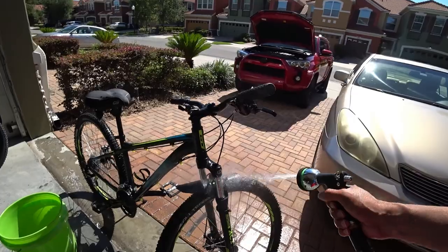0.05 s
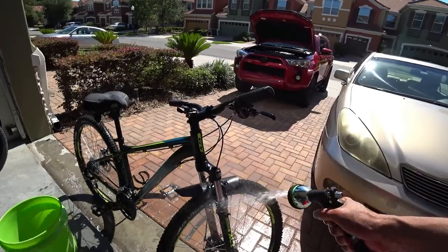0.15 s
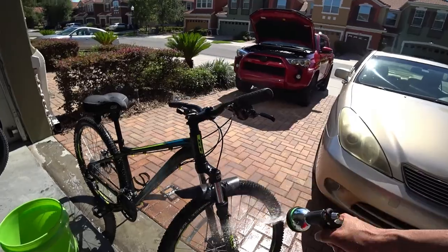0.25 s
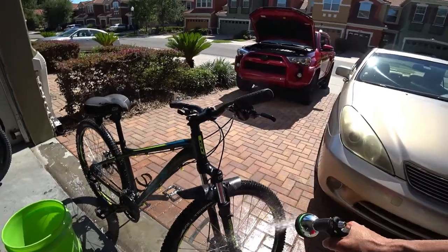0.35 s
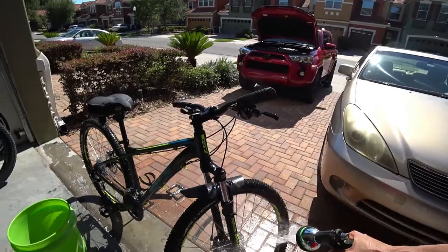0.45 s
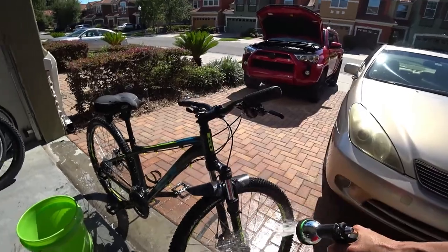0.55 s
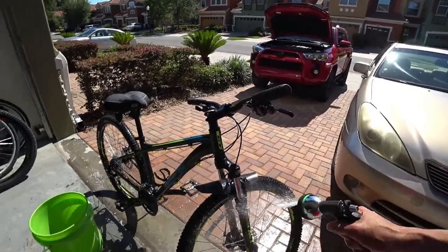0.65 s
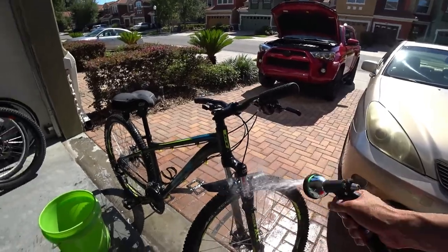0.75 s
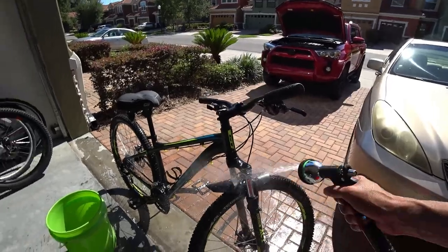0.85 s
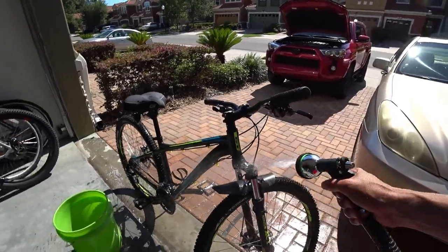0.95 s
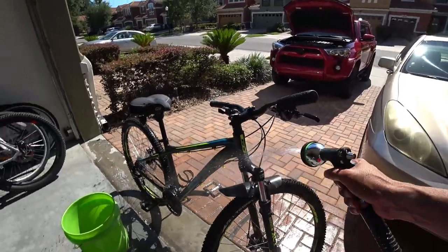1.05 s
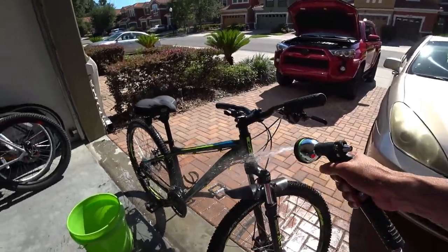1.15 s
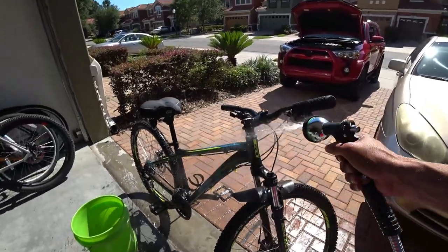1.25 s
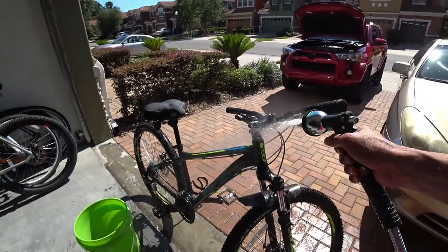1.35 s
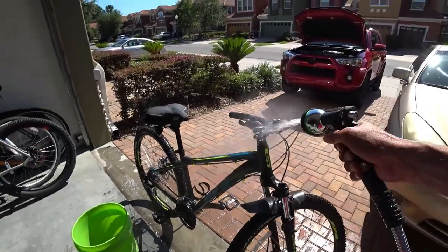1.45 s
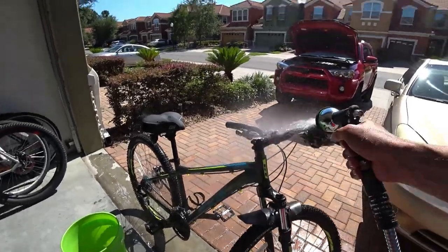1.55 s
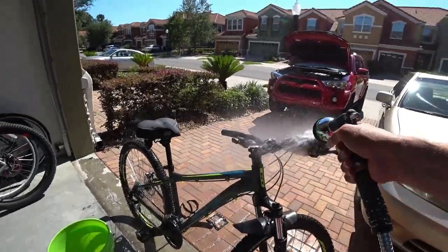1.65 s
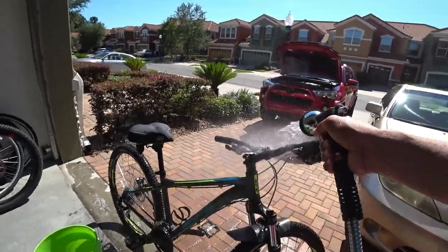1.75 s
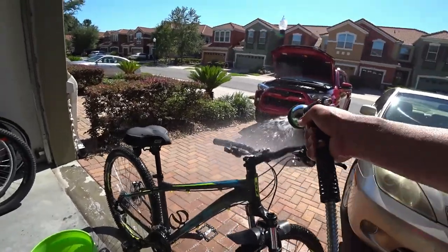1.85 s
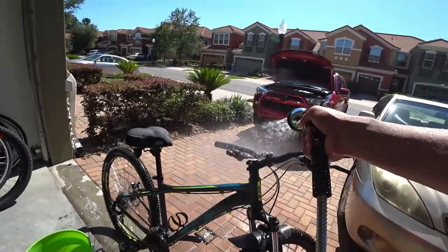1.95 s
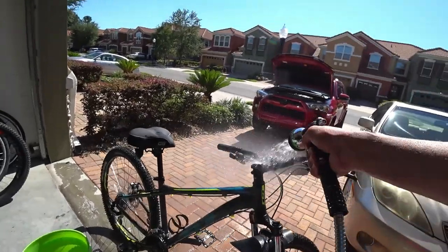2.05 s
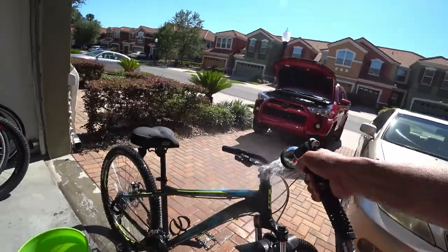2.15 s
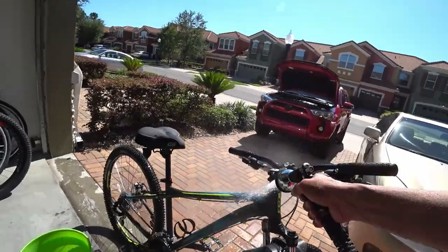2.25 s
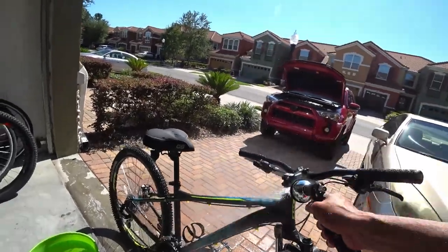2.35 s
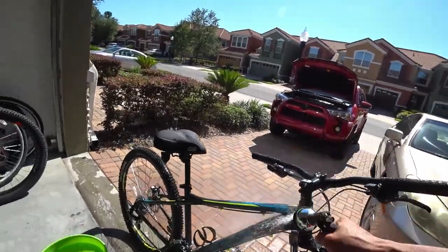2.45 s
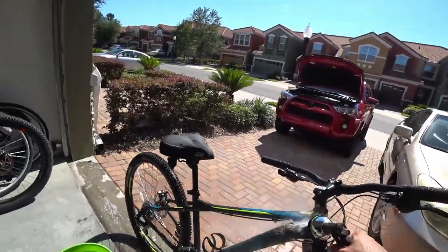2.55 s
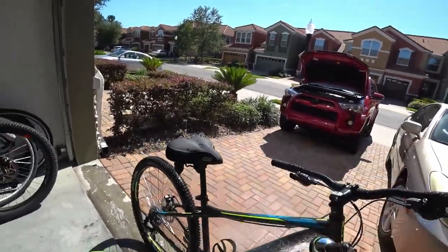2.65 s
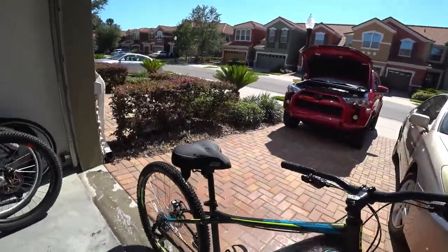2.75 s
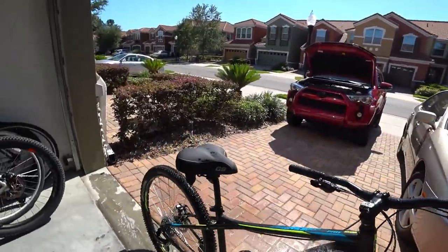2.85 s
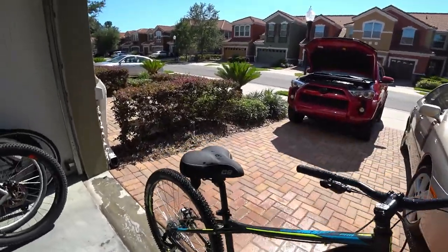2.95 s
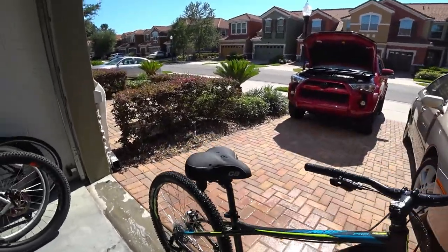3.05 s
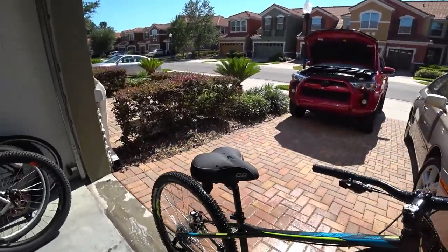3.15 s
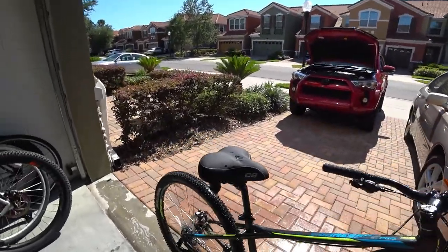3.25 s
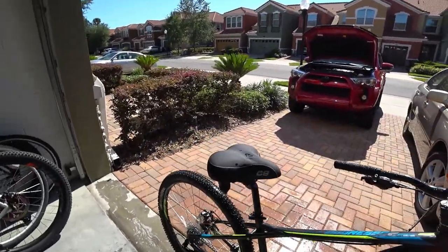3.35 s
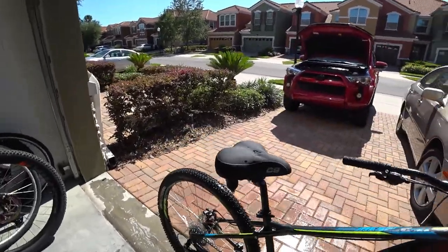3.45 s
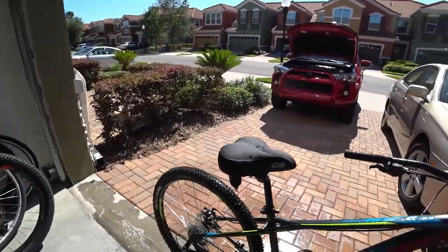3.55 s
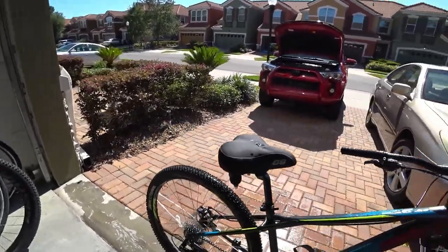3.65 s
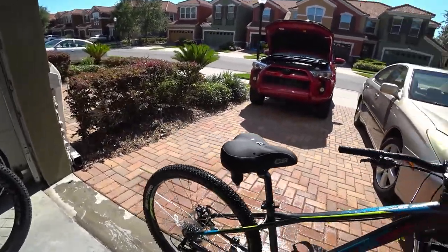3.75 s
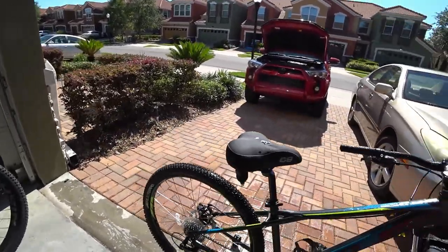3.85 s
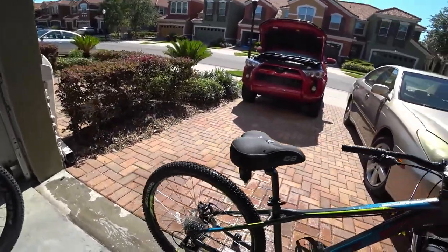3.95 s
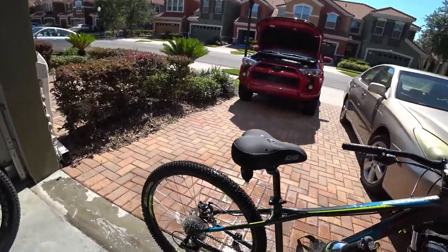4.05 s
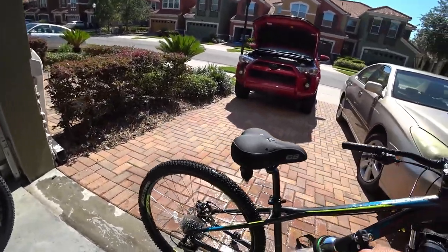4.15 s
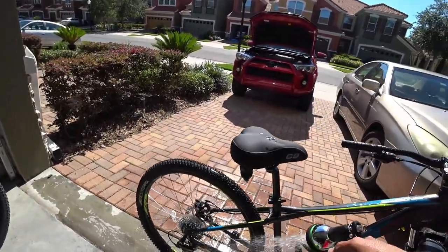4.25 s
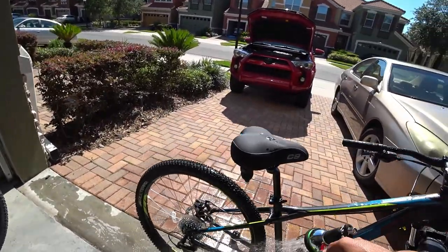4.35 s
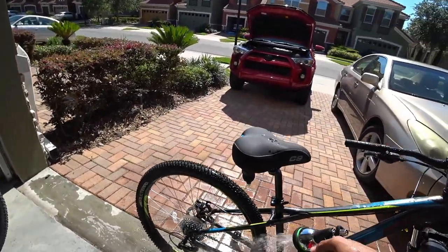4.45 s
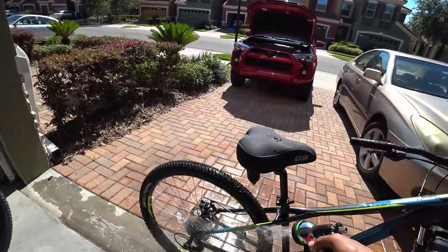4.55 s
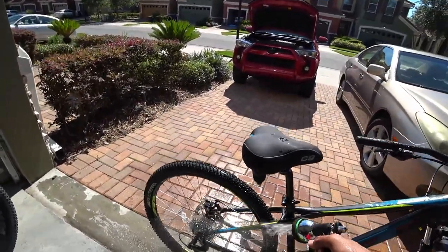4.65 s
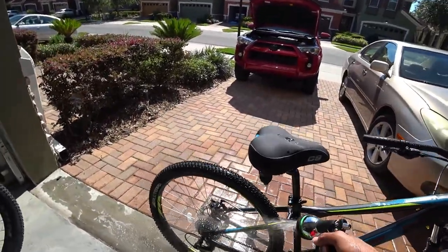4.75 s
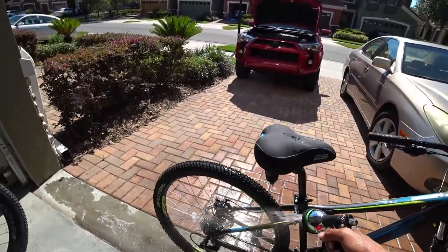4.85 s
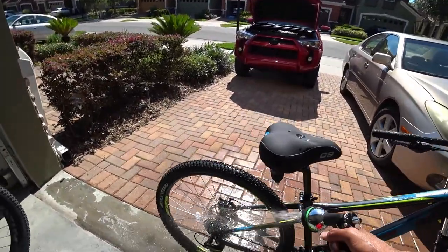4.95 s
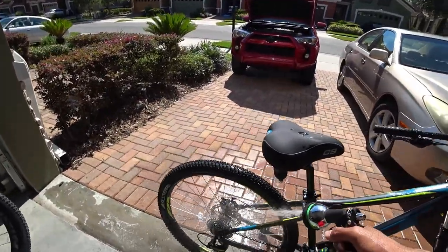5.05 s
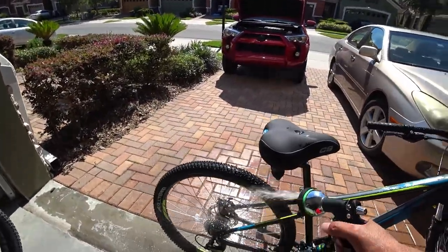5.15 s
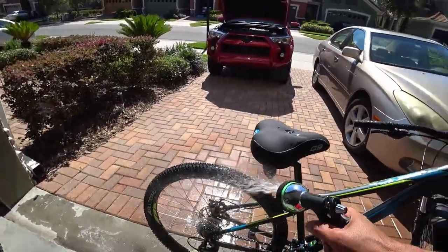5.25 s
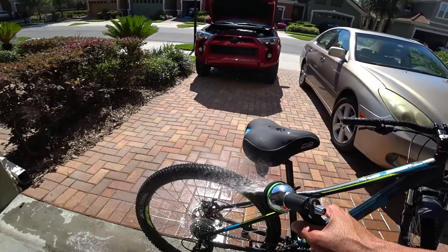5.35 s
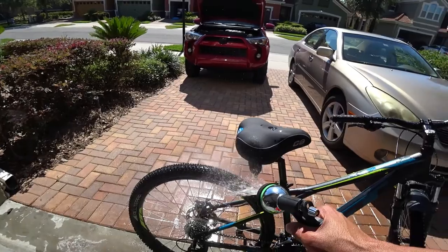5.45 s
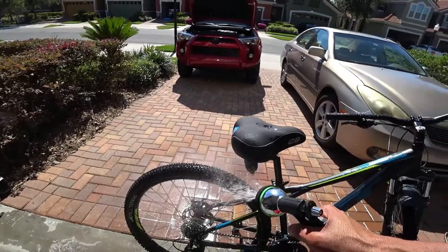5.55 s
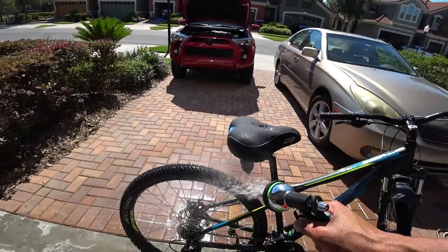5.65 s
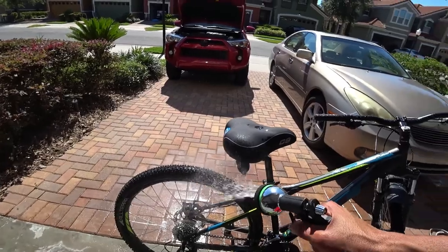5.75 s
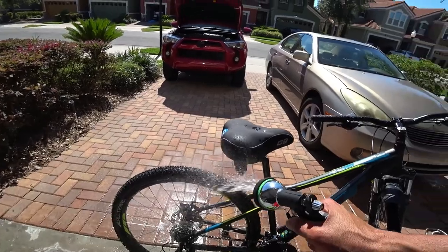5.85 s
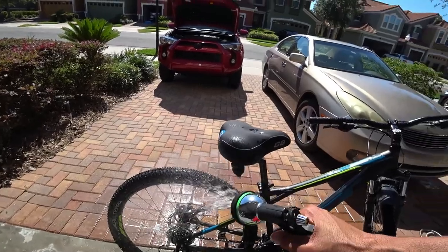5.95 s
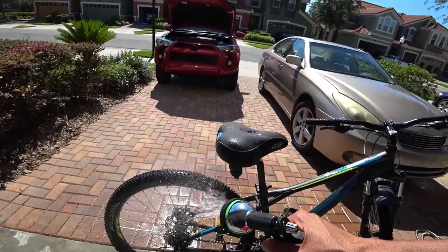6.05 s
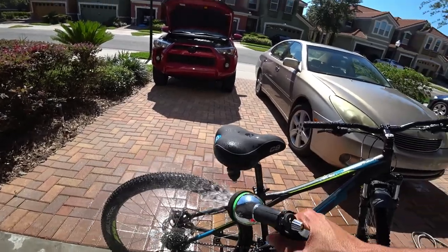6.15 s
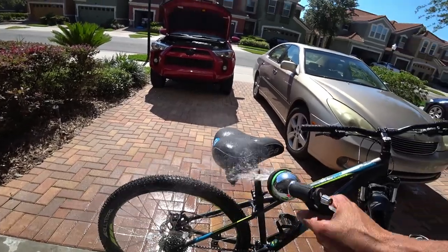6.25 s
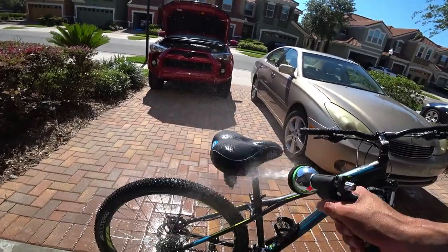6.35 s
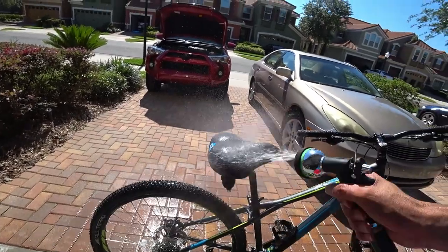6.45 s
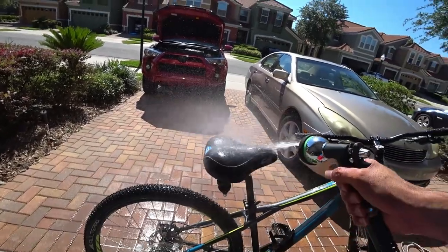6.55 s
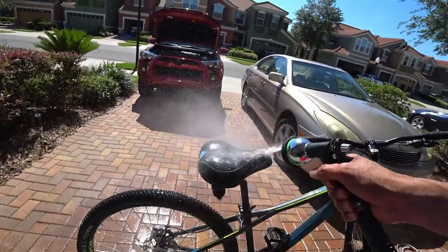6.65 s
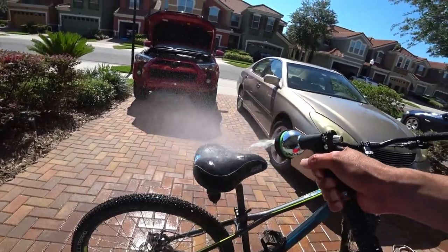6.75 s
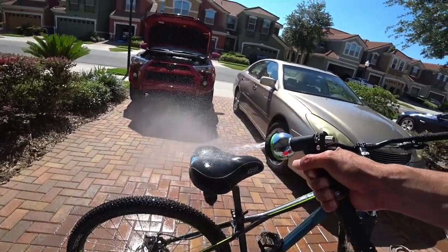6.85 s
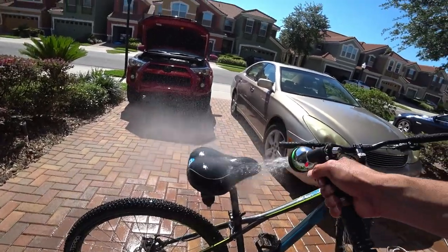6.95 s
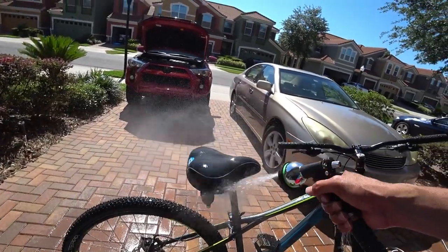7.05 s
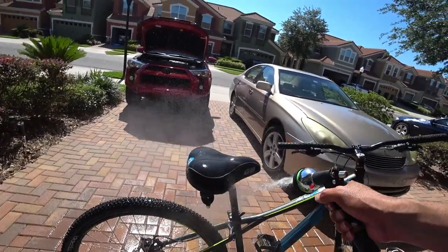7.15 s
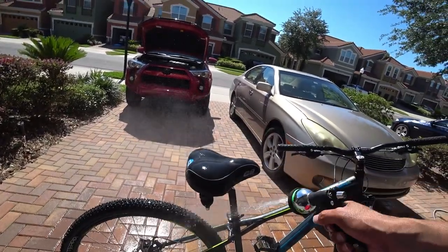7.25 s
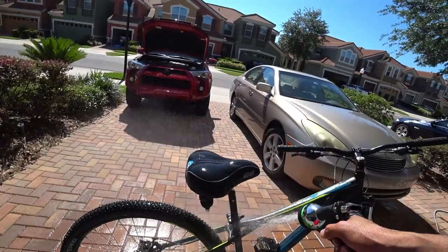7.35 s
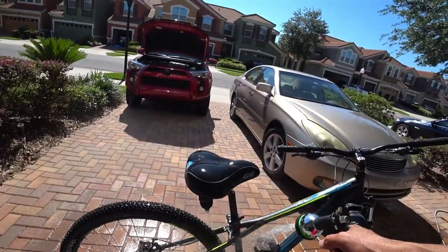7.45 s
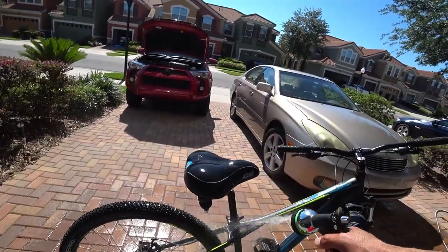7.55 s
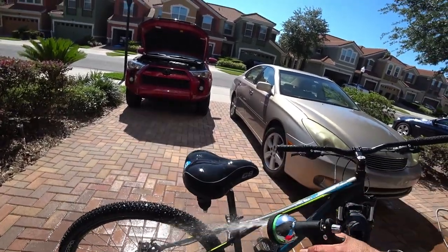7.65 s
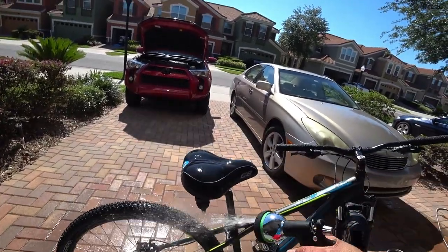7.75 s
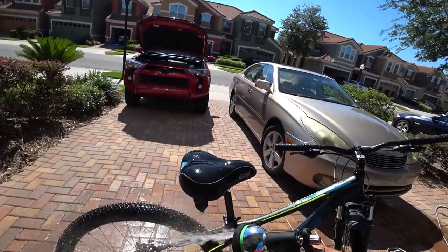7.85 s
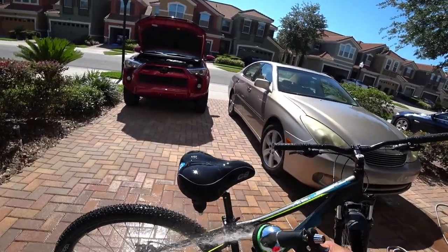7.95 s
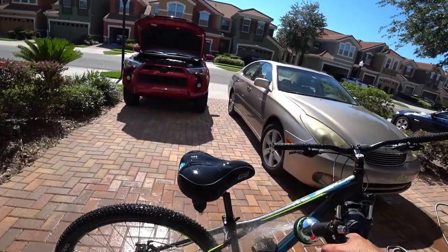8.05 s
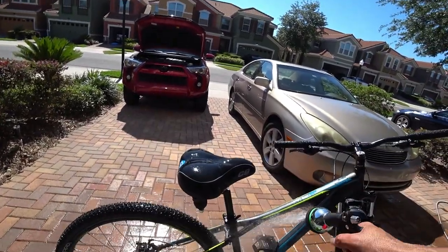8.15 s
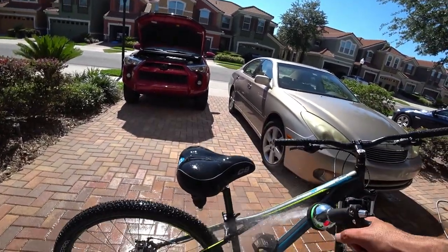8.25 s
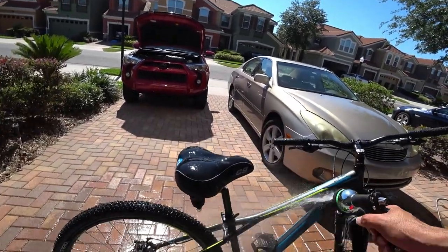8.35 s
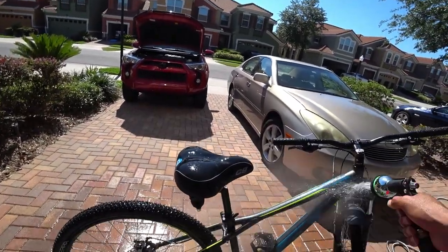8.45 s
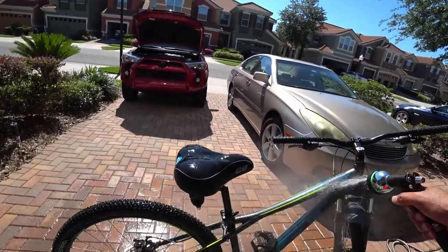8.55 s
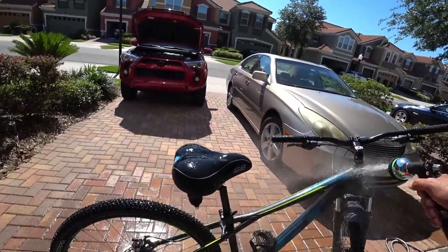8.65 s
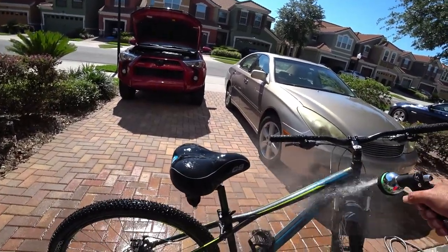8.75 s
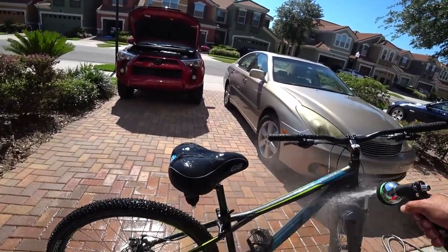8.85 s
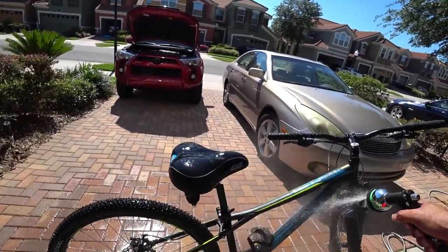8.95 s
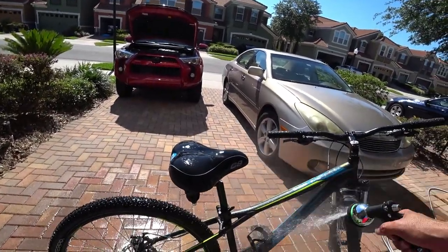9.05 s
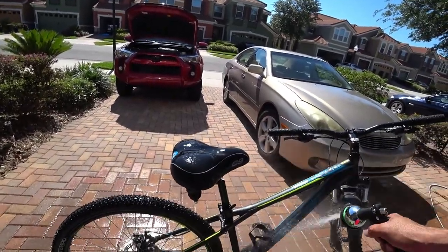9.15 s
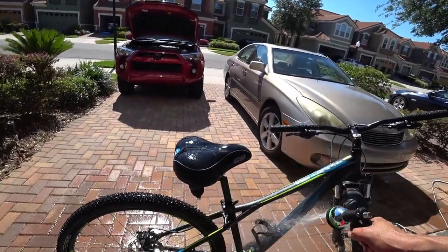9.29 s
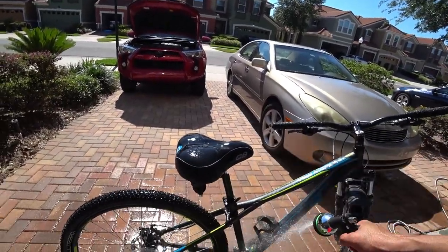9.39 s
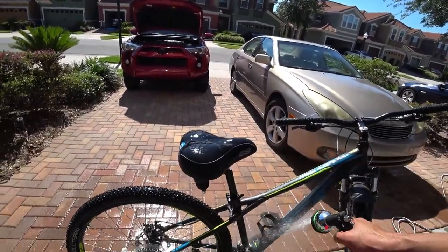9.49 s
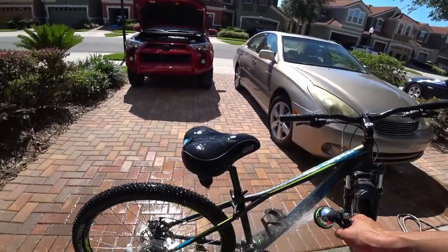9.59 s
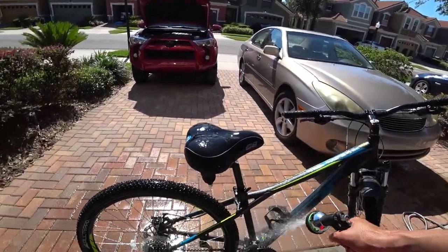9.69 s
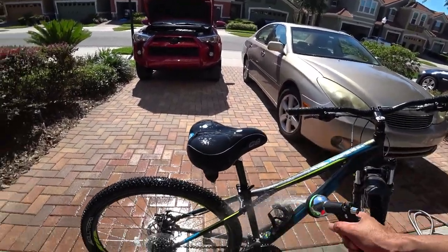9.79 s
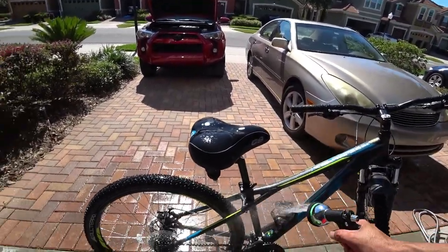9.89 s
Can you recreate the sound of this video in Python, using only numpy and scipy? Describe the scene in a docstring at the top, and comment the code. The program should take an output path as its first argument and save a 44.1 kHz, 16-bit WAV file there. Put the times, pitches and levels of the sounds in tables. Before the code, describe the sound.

Close water spray hisses and spatters over a bike outdoors, drumming on the wheel, rushing on the saddle, then ringing along the frame.

```python
"""A garden hose washes a bicycle on a paved driveway, an arm's length from the microphone.
Throughout, shaped noise makes water patter on the paving, random hits make mist hiss and drops spatter,
and short high tones tick. The same kind of hits, filtered, drum on the front wheel first. From about 1 s,
brief rings and broad bright splashes, each one resonance, come as the jet crosses the bike. Then the stem
rings, the saddle rushes, the seat clamp rings, and near the end the frame tube rings long and clear."""
import sys
import numpy as np
from scipy import signal
from scipy.fft import rfft, irfft
from scipy.io import wavfile

SR = 44100
rng = np.random.default_rng(int(sys.argv[2]) if len(sys.argv) > 2 else 0)


def to_wav(s):
    """Save 16-bit WAV."""
    ch = np.atleast_2d(s).T  # columns
    pcm = np.round(np.clip(ch, -1, 1) * 32767)  # PCM
    wavfile.write(sys.argv[1], SR, pcm.astype(np.int16))


N = 437472

TIME = np.arange(N) / SR  # seconds
FREQ = np.fft.rfftfreq(N, 1 / SR)  # Hz
HAND_HZ = 14  # how often the aim of the hand wavers, in new levels per second
JET_EDGE = 1.26  # flank of the jet: 1 is a soft skirt, 2 a bell
TOP_HZ = 11080  # highest pitch that the recorder lets through, in Hz


def undb(db):
    """Turn decibels into a gain."""
    return np.exp(np.asarray(db) * np.log(10) / 20)


def shape(points):
    """Draw a gain for every frequency through (frequency [Hz], level [dB]) points."""
    hz, db = np.transpose(points)
    return undb(np.interp(np.log(FREQ + 1), np.log(hz), db))


def ringing(modes):
    """Response of a part with several resonances, each of which radiates poorly below its pitch."""
    response = 0
    for hz, width, db in modes:
        damping = 1j * FREQ * width
        resonance = damping / (hz ** 2 - FREQ ** 2 + damping)
        response = response + undb(db) * resonance * np.minimum(FREQ / hz, 1)
    return response


def resonate(x, hz, width):
    """One resonance driven by a stream of drops, scaled to an rms of 1 in the mid stream."""
    b, a = signal.iirpeak(hz, hz / width, fs=SR)
    ring = signal.lfilter(b, a, x)
    return ring / ring[0].std()


def through(x, response):
    """Filter a sound by a frequency response."""
    return irfft(rfft(x) * response, N)


def unit(response, lo=0, hi=SR / 2):
    """Scale a response so that white noise leaves it with an rms of 1 between lo and hi, in Hz."""
    in_band = (FREQ >= lo) & (FREQ <= hi)
    return response / np.sqrt(np.mean(np.abs(response) ** 2 * in_band))


def walk(rate):
    """Random levels, rate of them a second, joined by straight lines, with a spread near 1."""
    steps = rng.standard_normal(N // 20)
    return 1.174 * np.interp(TIME * rate, np.arange(len(steps)), steps)


def aimed(curve, waver_db):
    """Gain from (time [s], level [dB]) rows, with the waver of the hand on top."""
    return undb(np.interp(TIME, *np.transpose(curve)) + waver_db * walk(HAND_HZ))


def contact(part, waver_db):
    """Share of the jet on a part: it slides on and off smoothly, and sags and wavers while it stays."""
    # The jet rests on a part of the bike:
    # (part, start [s], end [s], level [dB], sag [dB/s], time to slide on or off [s])
    passes = [("wheel", 0, 0.11, -23.5, 22, 0.078), ("wheel", .63, .68, -38, 0, .035),
              ("wheel", 0.724, 0.818, -22.6, 3, .042), ("stem", 2.68, 2.85, -38, 0, .03),
              ("stem", 3.15, 3.23, -30, 0, .09), ("stem", 3.31, 3.37, -27, 0, .04),
              ("stem", 3.46, 3.5, -26.5, 0, 0.03), ("stem", 3.62, 4.4, -30, 3, .06),
              ("stem", 4.45, 5.15, -39, 4, .08), ("saddle", 6.23, 6.275, -26.5, 0, 0.027),
              ("saddle", 6.34, 6.43, -27, 28, 0.042), ("saddle", 6.6, 6.76, -29.5, 30, 0.11),
              ("saddle", 6.88, 7.1, -24, 36, .026), ("clamp", 8.15, 8.2, -30.5, 15, .04),
              ("clamp", 8.35, 8.54, -27, 3, .03), ("clamp", 8.65, 8.69, -31.5, 0, 0.043),
              ("tube", 8.88, 9.1, -38, 0, .17), ("tube", 9.25, 9.71, -34.3, 0, 0.041)]
    gain = np.zeros(N)
    for name, start, end, db, sag, slide in passes:
        if name == part:
            held = np.clip(TIME, start, end)
            flank = np.exp(-np.abs((TIME - held) / slide) ** JET_EDGE)
            level = undb(db - sag * (held - start))
            gain = np.hypot(gain, level * flank)
    return gain * undb(waver_db * walk(HAND_HZ))


def drops(rate, scatter_db, fine_db, flutter_db):
    """Impacts (rate a second) of scattered size and place over countless fine droplets, as mid and side."""
    sizes = undb(scatter_db * np.clip(rng.standard_normal(N), -2.6, 2.6))
    signs = np.sign(rng.random(N) - .5)
    lands = rng.random(N) < rate / SR
    hits = signs * sizes * lands
    places = np.array([np.ones(N), rng.standard_normal(N)])
    water = hits / hits.std() * places + undb(fine_db) * rng.standard_normal((2, N))
    # the jet breaks into slugs, so the impacts come in clumps
    water = water * undb(flutter_db * (1.06 * walk(45) + walk(220)))
    return water / water[0].std()


def paving():
    """The rest of the water falls on the paving in a steady patter of shaped noise."""
    # Tone color of water on the paving: (frequency [Hz], level [dB])
    color = [(25, -32), (70, -25), (90, -21.5), (120, -20.5), (170, -18), (240, -10), (350, -2.5),
             (550, 1.5), (720, -2.5), (1050, 1), (1600, -3), (3000, -12.5), (9000, -24.5)]
    return undb(-45.5) * through(rng.standard_normal((2, N)), unit(shape(color)))


def mist():
    """Fine mist hisses at the nozzle: many small impacts, mostly heard at high pitch."""
    # Tone color of the mist: (frequency [Hz], level [dB])
    color = [(40, -60), (500, -26), (1500, -17), (3500, -9.5), (5000, -4), (7000, -0.5), (8400, 0),
             (9400, -4), (10500, 2), (11200, -5)]
    # Level of the hiss as the hand aims the nozzle: (time [s], level [dB])
    level = [(0.28, -42.5), (1.18, -41.0), (1.44, -36.5), (1.56, -41.5), (1.66, -36.5), (1.78, -42.5),
             (2.04, -38), (2.82, -39.5), (2.9, -46.0), (3.0, -39), (4.12, -35.5), (4.7, -41.5), (5.18, -41),
             (5.48, -37.5), (6.05, -42.0), (6.8, -40), (7.09, -33.5), (7.17, -44.5), (7.24, -36.5),
             (7.42, -43.5), (7.52, -37.5), (7.9, -45), (8.0, -39.5), (8.2, -38.5), (8.58, -40.5),
             (9.02, -37), (9.16, -40.5), (9.26, -37.5), (9.9, -39)]
    water = drops(rate=4500, scatter_db=6.0, fine_db=2.5, flutter_db=0.77)
    return through(water, unit(shape(color), lo=9420, hi=10750)) * aimed(level, waver_db=1.0)


def spatter():
    """Drops spatter on spokes and tubes, as impacts with a broad tone color."""
    # Tone color of the spatter: (frequency [Hz], level [dB])
    color = [(40, -42), (170, -23.5), (330, -9.5), (550, -6.5), (750, -10.5), (1100, -5.5), (1600, -5),
             (2300, -1.5), (3100, 0), (4000, -0.5), (6500, 0), (9000, -8), (11200, -26)]
    # Level of the spatter, highest with the jet in the spokes: (time [s], level [dB])
    level = [(0.28, -42.5), (1.1, -46.0), (1.8, -46.5), (2.02, -42), (2.16, -49.5), (2.72, -42.5),
             (2.92, -43.5), (3.78, -38.5), (4.8, -40), (5.36, -37), (6.1, -37.5), (7.2, -43), (7.42, -44.5),
             (7.74, -37.5), (8.16, -44.5), (8.62, -45), (8.76, -42), (9.7, -40.5), (9.78, -44)]
    water = drops(rate=4000, scatter_db=4, fine_db=-1, flutter_db=0.74)
    return through(water, unit(shape(color), lo=2450, hi=3950)) * aimed(level, waver_db=0.64)


def strays(count, peak_db, spread_db):
    """Small drops that bounce back at random, as rows of time, peak level, pitch and length."""
    when, size, pitch = rng.random((count, 3)).T
    s = when * (TIME[-1] - .01)  # leaves room for the last drop to end
    db = peak_db - spread_db * np.sqrt(size)
    return np.transpose([s, db, 5500 + 5000 * pitch, np.full(count, .0006)])


def ticks():
    """Each short high tick is a tone of a few cycles that swells and fades at once."""
    # Short high ticks: (time [s], peak level [dB], pitch [Hz], length [s])
    high_ticks = [(1.007, -15, 6000, .0007), (1.395, -17, 8500, .0007), (1.442, -17, 8500, .0007),
                  (2.197, -10, 8300, .0007), (2.202, -19, 10400, .002), (2.926, -13.5, 6650, .001),
                  (2.926, -25, 10800, 0.00092), (7.894, -17, 8040, 0.00063), (8.162, -13, 7700, .0007)]
    out = np.zeros(N)
    for s, db, hz, length in np.vstack([high_ticks, strays(count=130, peak_db=-17, spread_db=6)]):
        start = int(s * SR)
        swell = np.hanning(int(length * SR))
        tone = np.sin(2 * np.pi * hz * TIME[:len(swell)])
        out[start:start + len(swell)] += undb(db) * swell * tone
    return out


def crossings(jet):
    """Narrow resonances ring and wide ones splash; each swells and fades as the jet crosses the bike."""
    # Brief rings and broad bright splashes as the jet crosses the bike:
    # (start [s], end [s], pitch [Hz], width [Hz], level [dB])
    rings_and_splashes = [(1.3, 2.15, 4670, 450, -44.5), (1.42, 2.025, 1650, 160, -49),
                          (2.8, 3.25, 2690, 30, -47.5), (3.478, 4.2, 2160, 260, -45.5),
                          (3.2, 4.45, 2900, 250, -45), (0.996, 1.04, 6000, 2000, -37),
                          (3.85, 3.89, 4800, 3000, -31), (4.047, 4.214, 4350, 90, -36.5),
                          (4.26, 4.41, 9800, 200, -40), (4.697, 5.15, 4520, 80, -42),
                          (4.74, 5.02, 1250, 80, -45), (5.285, 5.41, 986, 50, -37.5),
                          (5.85, 6.2, 3500, 200, -41.5), (8.68, 9.15, 7770, 170, -32),
                          (9.144, 9.792, 6330, 550, -35.5), (9.098, 9.802, 7900, 1100, -34.5)]
    out = np.zeros((2, N))
    for start, end, hz, width, db in rings_and_splashes:
        span = slice(int(start * SR), int(end * SR))
        burst = resonate(jet[:, span], hz, width)
        out[:, span] += burst * undb(db) * signal.windows.tukey(burst.shape[1], .4)
    return out


def tube(jet):
    """The frame tube rings long and clear; its modes join in as the jet moves off their nodes."""
    # Resonances of the tube: (pitch [Hz], width [Hz], level before sharing [dB], start [s])
    modes = [(2725, 12, -0.5, 8.8), (3330, 14, -8, 9.2), (3520, 20, -2.5, 8.68), (3790, 24, -3, 9.18),
             (4770, 40, 1, 8.98), (5530, 35, -4, 9.6), (6030, 50, 3.5, 8.95), (7300, 98, 0, 9.1)]
    ring, power = 0, 1e-3  # a little above zero, to avoid dividing by zero
    for hz, width, db, start in modes:
        drive = undb(db) * np.clip((TIME - start) / .08, 0, 1)
        ring = ring + resonate(jet, hz, width) * drive
        power = power + drive ** 2
    # the modes share the power
    return ring / np.sqrt(power) * contact("tube", waver_db=1.0)


def fittings(jet):
    """Stem and seat clamp ring short and bright; being small, they slip in and out of the jet."""
    # Resonances of the stem: (pitch [Hz], width [Hz], relative level [dB])
    stem_modes = [(6780, 300, 7), (7100, 300, 1.5), (7680, 320, -5)]
    # Resonances of the seat clamp: (pitch [Hz], width [Hz], relative level [dB])
    clamp_modes = [(5580, 240, -1.5), (6100, 280, 1), (6500, 400, -7), (7050, 100, 2), (7950, 300, -9)]
    stem = through(jet, unit(ringing(stem_modes))) * contact("stem", waver_db=2.1)
    clamp = through(jet, unit(ringing(clamp_modes))) * contact("clamp", waver_db=2.1)
    return stem + clamp


def saddle(jet):
    """The padded saddle shatters the jet into a broad, bright rush."""
    # Tone color of the jet on the saddle: (frequency [Hz], level [dB])
    color = [(40, -65), (200, -28), (500, -18), (950, -3.5), (1400, -3.5), (2000, -3.5), (3500, -1),
             (4900, 4.5), (7000, 4), (8300, 3), (9400, -1), (11200, -1.5)]
    return through(jet, unit(shape(color), lo=1000, hi=5020)) * contact("saddle", waver_db=0.4)


def wheel(jet):
    """The full jet drums on the front tyre and fork: a broad splash with resonances."""
    # Tone color of the splash: (frequency [Hz], level [dB])
    color = [(40, -65), (350, -35), (600, -14.5), (1000, -6.5), (1400, -2.5), (2100, 0.5), (2800, 0),
             (5000, 0), (8000, 0), (9500, -7), (11200, -6.5)]
    # Resonances of the wheel: (pitch [Hz], width [Hz], relative level [dB])
    modes = [(1413, 45, 6), (1620, 70, 3), (1700, 40, -6), (1930, 62, -4), (2160, 57, 3), (2300, 64, -3),
             (3300, 190, -4), (5000, 130, -7)]
    splash = unit(shape(color))
    resonances = undb(-8) * np.abs(unit(ringing(modes)))
    # the resonances stand out of the splash without cancelling it
    body = np.hypot(splash, resonances)
    return through(jet, unit(body, lo=1000, hi=5100)) * contact("wheel", waver_db=0.3)


def glance(x):
    """Nearby surfaces reflect the water's sound and ripple its tone; the paths change as the hand moves."""
    # Reflections off the bike and the house wall:
    # (delay [s], sway of the path [share of the delay], level against the direct sound [dB])
    echoes = [(.0012, 0.197, -14.5), (.019, .02, -14.5)]
    out, power = x, 1
    for delay, sway, db in echoes:
        heard_at = TIME - delay * np.exp(sway * walk(1.5))
        echo = np.array([np.interp(heard_at, TIME, channel, left=0) for channel in x])
        out = out + undb(db) * echo
        power += undb(db) ** 2
    return out / np.sqrt(power)


def microphone(mid, side):
    """Two close ports hear nearly the same water, the right one slightly earlier."""
    # How alike left and right are: (frequency [Hz], coherence [0-1])
    alike = [(60, 0.97), (130, 0.95), (270, 0.92), (580, 0.7), (1230, 0.63), (2610, 0.74), (5540, 0.89),
             (11800, 0.84)]
    # Difference in loudness: (frequency [Hz], left minus right [dB])
    loudness_lean = [(100, 0.5), (1000, -.5), (2000, -1), (4000, 0.5), (10000, 1.1)]
    # Difference in phase: (frequency [Hz], how far left leads [radians])
    port_phase = [(60, 0), (350, -.25), (950, -0.56), (2200, -0.3), (4300, -0.08), (11000, -0.18)]
    likeness = np.clip(np.interp(FREQ, *np.transpose(alike)), 0, 1)
    mid = rfft(mid)
    side = rfft(side) * np.sqrt((1 - likeness) / (1 + likeness))
    # each side takes half of the differences
    phase = np.interp(FREQ, *np.transpose(port_phase))
    lean = np.sqrt(shape(loudness_lean)) * np.exp(.5j * phase)
    return irfft([(mid + side) * lean, (mid - side) / lean], N)


def scene():
    """The spray and everything that it strikes, heard in stereo."""
    # the dense middle of the jet, then its coarser, sputtering edge
    core = drops(rate=5000, scatter_db=2.5, fine_db=-2.5, flutter_db=0.5)
    fringe = drops(rate=2300, scatter_db=1.5, fine_db=-7.5, flutter_db=1.1)
    spray = paving() + mist() + spatter()
    reflected = glance(spray + saddle(core) + wheel(core))
    mid, side = reflected + crossings(core) + tube(fringe) + fittings(fringe)
    return microphone(mid + ticks(), side)


def record(dry):
    """The recorder cuts the top steeply with a low-pass filter."""
    low_pass = signal.ellip(12, .1, 85, TOP_HZ, fs=SR, output="sos")
    return signal.sosfilt(low_pass, dry)


dry = scene()
out = record(dry)
to_wav(out)
```